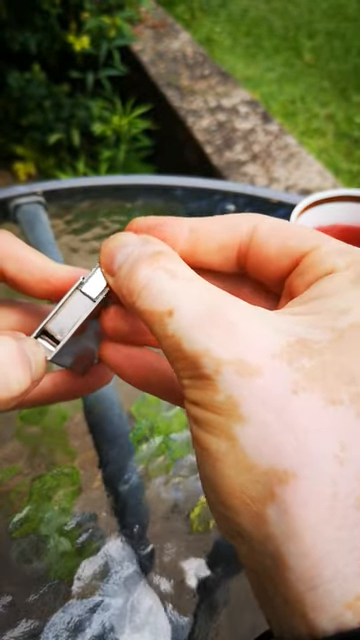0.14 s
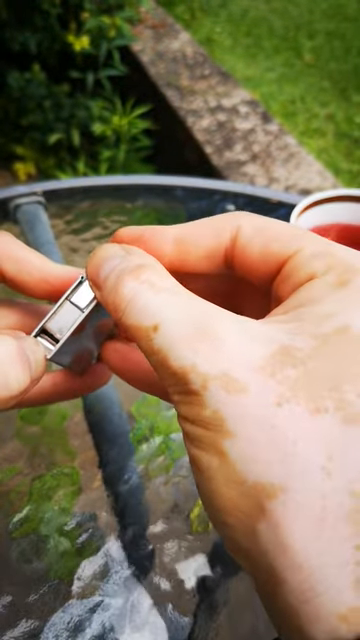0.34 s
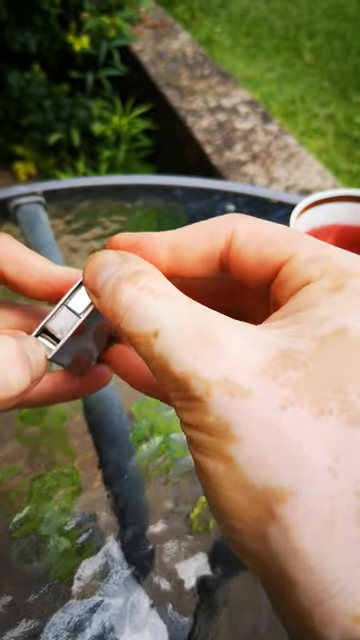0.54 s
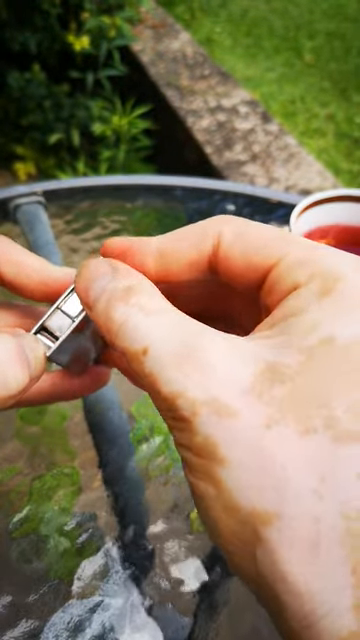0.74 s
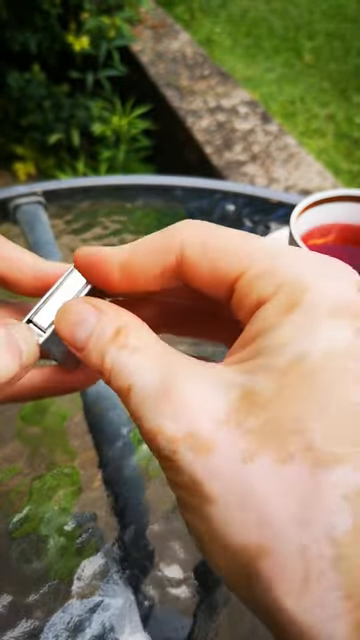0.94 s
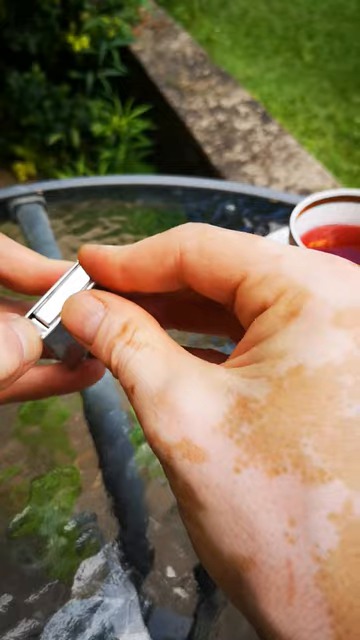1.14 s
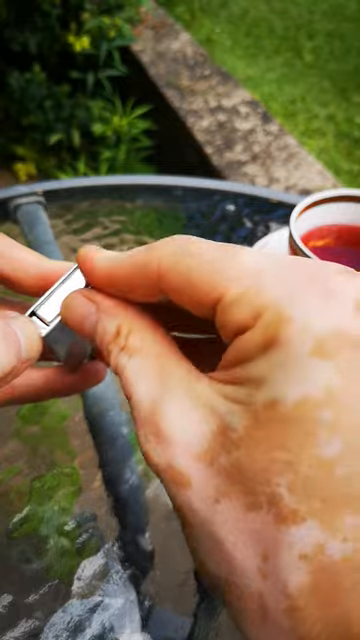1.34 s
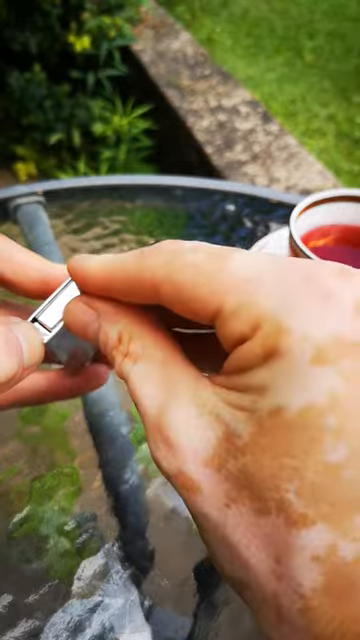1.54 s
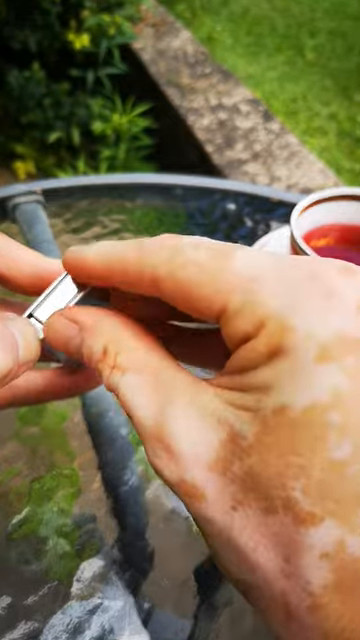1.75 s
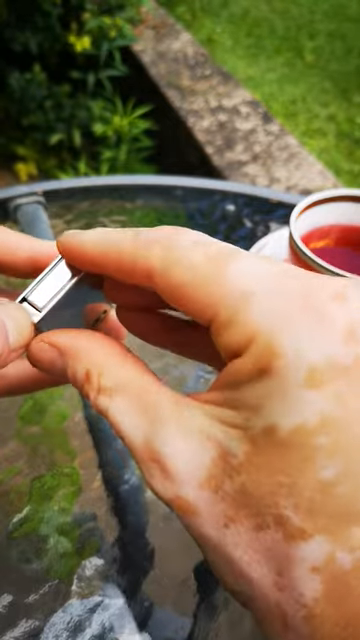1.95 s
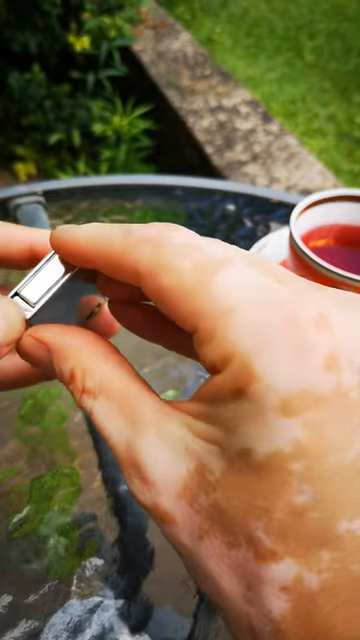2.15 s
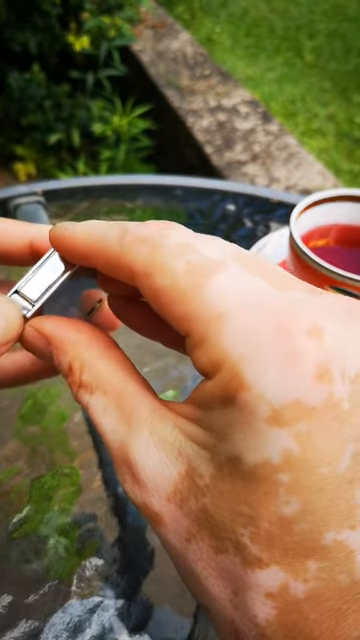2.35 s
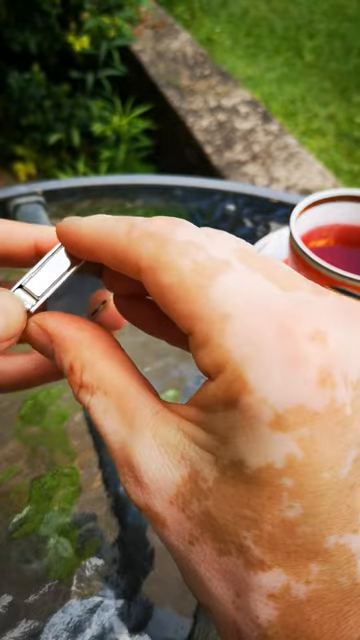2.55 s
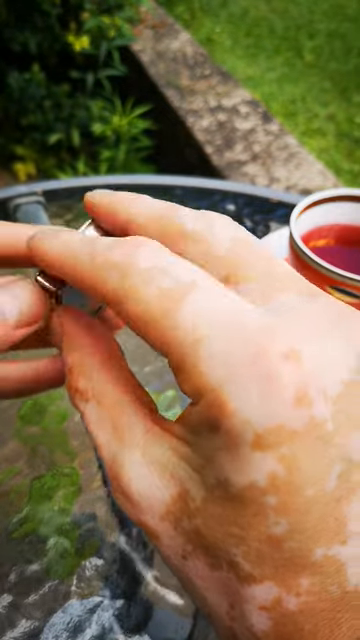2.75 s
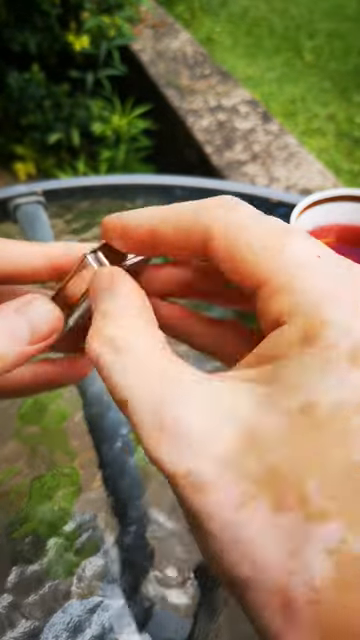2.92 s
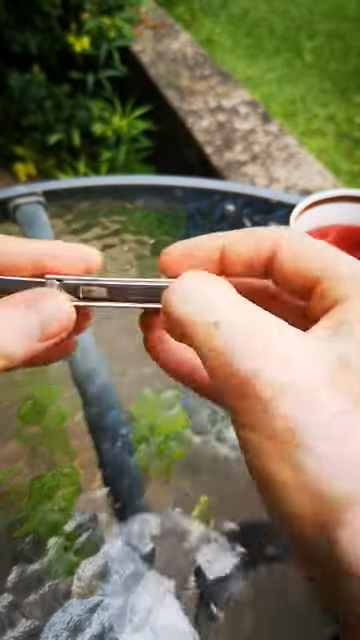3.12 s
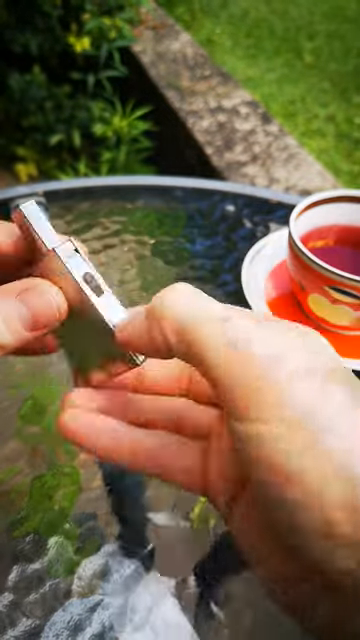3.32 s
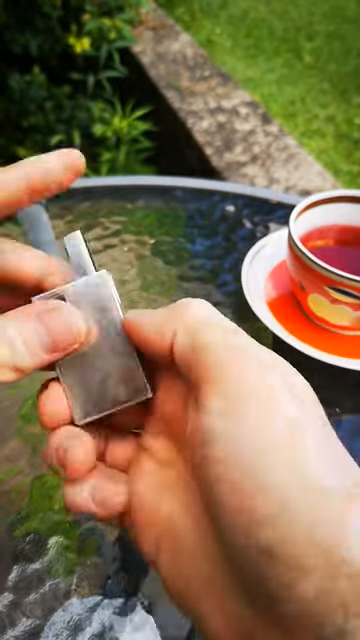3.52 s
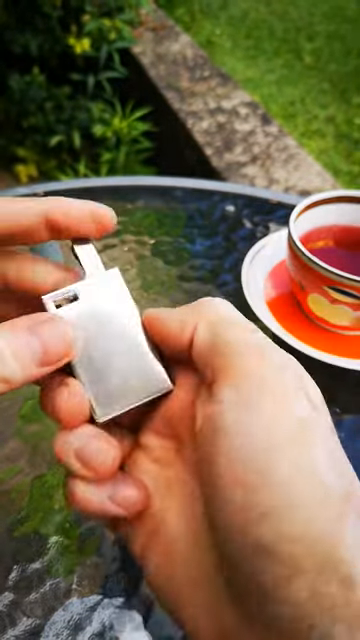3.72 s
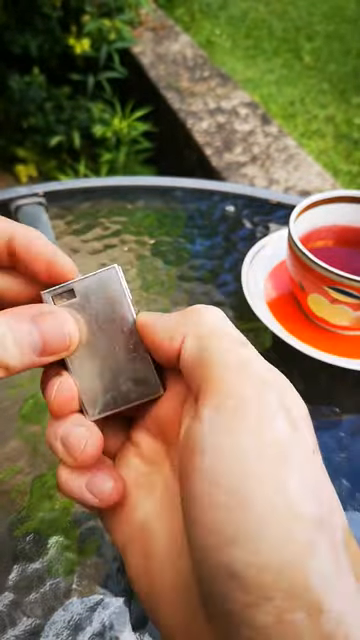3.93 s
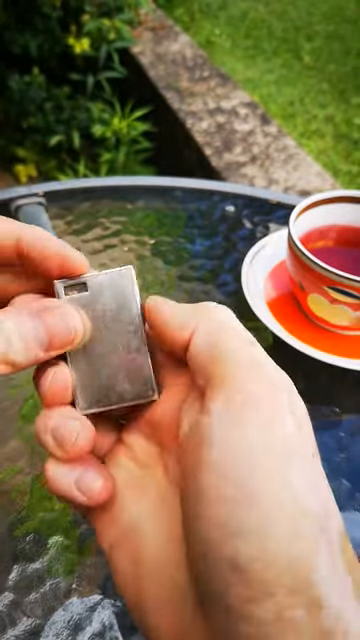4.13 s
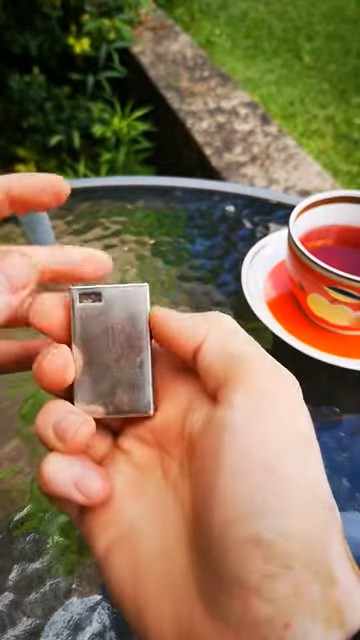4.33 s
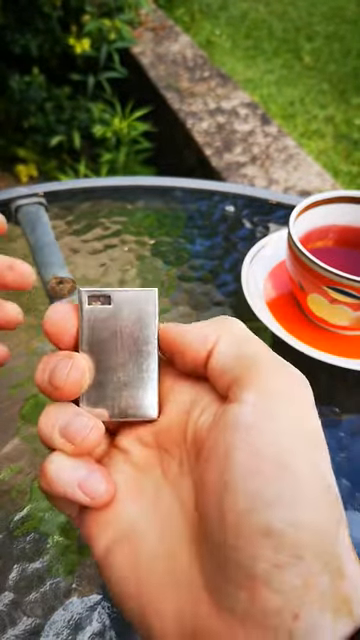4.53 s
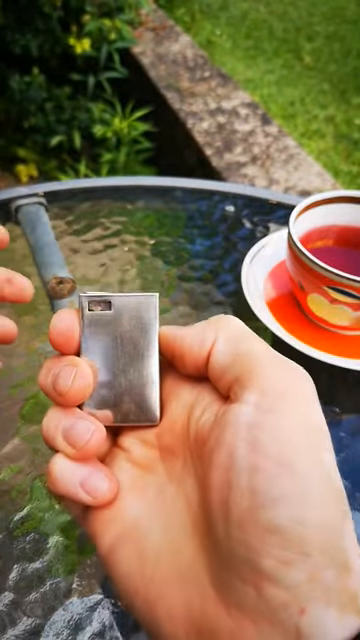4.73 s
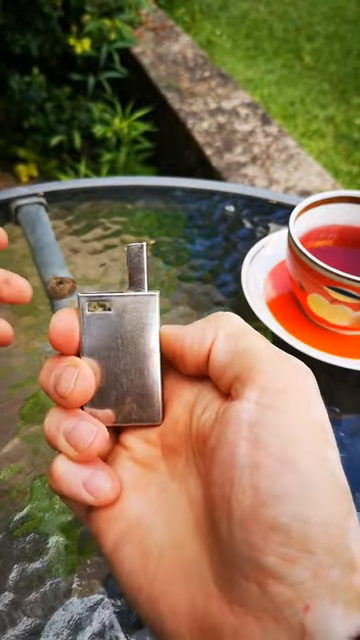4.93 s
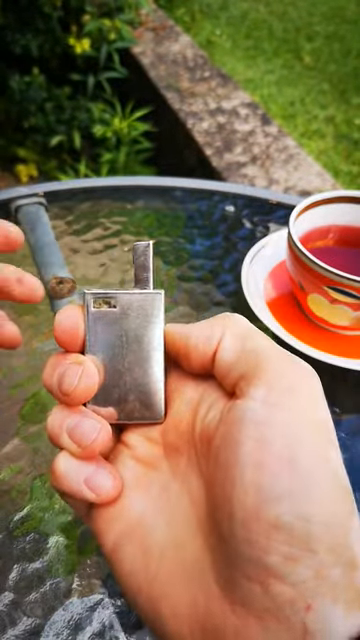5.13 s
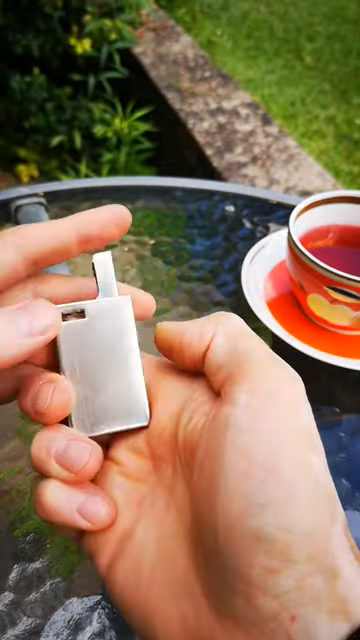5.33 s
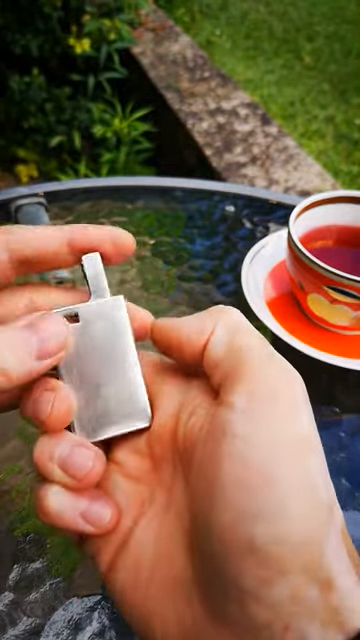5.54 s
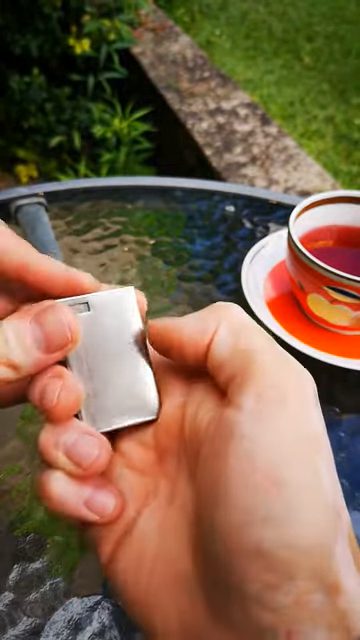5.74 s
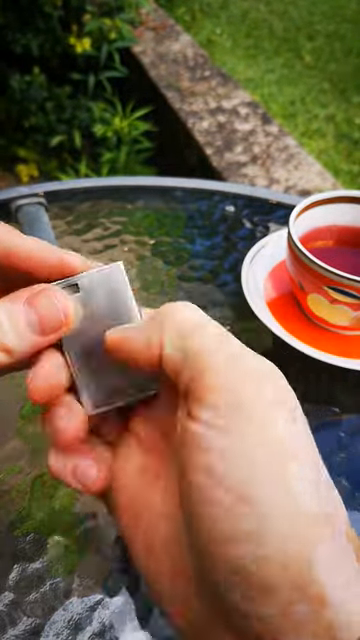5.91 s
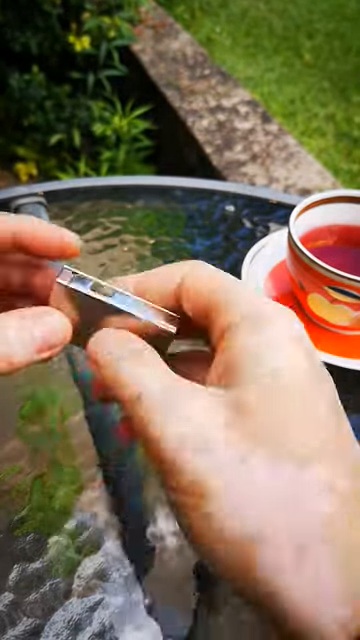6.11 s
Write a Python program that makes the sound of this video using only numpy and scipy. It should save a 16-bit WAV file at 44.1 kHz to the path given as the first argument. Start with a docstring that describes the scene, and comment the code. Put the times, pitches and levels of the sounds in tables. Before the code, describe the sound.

A close outdoor stereo pickup over a glass garden table. Low, irregular rumble and soft hiss of distant traffic run throughout. A barely audible tick comes at the start, then a bright, thin metal click at 0.9 s and a dull glassy knock at 1.0 s, with a weaker one just after. Only tiny ticks follow around 2.0 and 2.4 s. Near 3.2-3.5 s a faint bird whistle glides up and then slightly down; light metal ticks and a short rattling scrape follow until 3.65. At 3.88 a hard, dense snap bursts out, scraping into a duller clack at 3.98. A faint engine drone grows behind. At 4.92 a sharp snap leaves a thin, high ring. Small ticks and slides at 5.25-5.47 lead to a rising scrape and solid clack at 5.76, then a soft table knock at 6.14. Each loud hit has a short, scattered garden echo.

```python
"""In a garden, a small metal pocket lighter is worked by hand over a glass table.
Its latch and sliding bar snap, rattle and scrape: short bursts and small grains ring its metal parts.
Something knocks the table top, which rings too, and the garden scatters all these near sounds back.
Behind lie the hiss and rumble of far traffic (filtered noise), an engine's drone (wavering tones)
and birds (gliding whistles)."""
import sys
import numpy as np
from scipy import signal
from scipy.io import wavfile
from scipy.ndimage import uniform_filter1d

SR = 44100
rng = np.random.default_rng(int(sys.argv[2]) if len(sys.argv) > 2 else 0)


def magnitude_from_level(level_db):
    """Linear magnitude for a level in decibels (20 dB per decade)."""
    exponent = np.asarray(level_db, float) / 20
    return 10 ** exponent


def output_pcm(signal):
    """Save a mono or channel-first signal as 16-bit PCM at the path in sys.argv[1].

    Samples are clipped to [-1, 1] before scaling.
    """
    pcm = np.clip(np.atleast_2d(signal).T, -1, 1) * 32767
    wavfile.write(sys.argv[1], SR, np.round(pcm).astype(np.int16))


N = 272097


def rms_one(x):
    """Scale to rms 1."""
    return x / np.sqrt(np.mean(x ** 2) + 1e-20)


def in_time(curve):
    """Read a curve of (time, value) points at every sample."""
    times, values = np.transpose(curve)
    return np.interp(np.arange(N) / SR, times, values)


def at_hz(points, hz):
    """Read a curve of (frequency, value) points on a log-frequency axis."""
    point_hz, values = np.transpose(points)
    return np.interp(np.log(hz), np.log(point_hz), values)


def drift(rate_hz):
    """Slow random wandering of rms 1: smoothed noise, drawn once every 40 samples."""
    r = np.exp(-2 * np.pi * rate_hz * 40 / SR)
    noise = rng.standard_normal(N // 40 + 2002)
    slow = signal.lfilter([1], [1, -2 * r, r * r], noise)[2000:]   # leave out the run-in
    return np.interp(np.arange(N) / 40, np.arange(len(slow)), rms_one(slow))


def chatter(shape):
    """Stereo noise, partly alike on both sides."""
    alike = 0.4   # share of the power that both sides have in common
    common = rng.standard_normal(shape)
    own = rng.standard_normal((2, *shape))
    return np.sqrt(alike) * common + np.sqrt(1 - alike) * own


def ring(force, modes):
    """A force sets parallel modes (f/Hz, level/dB, time to die by 60 dB/s) ringing, signs alternating."""
    out = 0
    for k, (hz, level_db, t60) in enumerate(modes):
        r = magnitude_from_level(-60 / (t60 * SR))
        w = 2 * np.pi * hz / SR
        push = (-1) ** k * magnitude_from_level(level_db) * np.sin(w)
        out = out + signal.lfilter([0, push], [1, -2 * r * np.cos(w), r * r], force + 1e-18)
    return out


def place(sounds, times, pans_db):
    """Lay stereo sounds in time, panned (left over right, dB) at even power."""
    length = sounds.shape[2]
    out = np.zeros((2, N + length))
    for k, (start, pan_db) in enumerate(zip(times, pans_db)):
        i = round(start * SR)
        side = rms_one(magnitude_from_level(np.array([[pan_db / 2], [-pan_db / 2]])))
        out[:, i:i + length] += sounds[:, k] * side
    return out[:, :N]


def lagged(pair, lag_ms):
    """Delay the left channel against the right."""
    lag = round(lag_ms * SR / 1000)
    return np.array([np.roll(pair[0], lag), pair[1]])


def road_noise():
    """Half-octave bands of noise, from deep rumble to hiss, rise and fall together under one curve."""
    # noise spectrum before the gain below: f/Hz, strength/dB
    spectrum = [(20, -9), (40, -8.5), (69, -14), (96, -21), (150, -23.5), (250, -25), (330, -37.5),
                (450, -34), (650, -37), (1050, -30), (1500, -39.5), (1900, -39), (2960, -53), (7000, -59),
                (11000, -67.5), (15100, -65.5)]
    # how alike left and right are: f/Hz, likeness/1
    likeness = [(60, 0.97), (180, 0.97), (400, 0.96), (800, 0.28), (1600, 0.14), (4000, .15), (15000, .02)]
    # gain of the road noise: t/s, gain/dB
    road_gain = [(0.0, -18.5), (0.48, -19.5), (1.1, -18), (1.41, -19), (2.75, -19.5), (3.33, -18),
                 (4.76, -17.5), (5.0, -20.5), (5.36, -17.5), (6.17, -17)]
    hush, together, run_in = 0, drift(1.9), SR // 2
    edges = 18 * 2 ** np.arange(0, 10.2, 0.5)
    white = rng.standard_normal((2, 2, N + run_in))
    for k, (lo, hi) in enumerate(zip(edges, edges[1:])):
        band = signal.butter(2, [lo, hi], "band", fs=SR, output="sos")
        # neighbouring bands take different noise
        mid, side = signal.sosfilt(band, white[k % 2])[:, run_in:]
        hz = np.sqrt(lo * hi)
        alike = np.clip(at_hz(likeness, hz), -1, 1)
        gain = magnitude_from_level(at_hz(spectrum, hz) + 0.26 * (together + drift(8)))
        pair = gain * (np.sqrt(1 + alike) * mid + np.sqrt(1 - alike) * side * [[1], [-1]])
        # the road lies to the right; the deep part reaches both sides together, almost the same
        hush = hush + lagged(pair, 0.58 * (hz > 200))
    return hush * magnitude_from_level(in_time(road_gain))


def deep_rumble():
    """Deep rumble near 60 Hz: narrow-band noise, its level rising and falling irregularly."""
    # irregular rise and fall of the level: t/s, level/dB
    rumble_curve = [(0.0, -43), (0.36, -60), (0.39, -44.5), (0.53, -60), (0.58, -48.5), (1.99, -46),
                    (2.75, -56.5), (2.8, -36.5), (2.85, -53), (2.99, -44.5), (3.37, -56), (3.4, -44),
                    (3.71, -61.5), (4.09, -47), (5.19, -54), (5.29, -40), (5.4, -62), (5.52, -41.5),
                    (6.07, -55.5), (6.17, -44)]
    centre_hz, half_width_hz, run_in = 59.8, 15, SR // 2
    wander_db, wander_rate_hz = 2.5, 1.3   # further random changes of level
    edges = [centre_hz - half_width_hz, centre_hz + half_width_hz]
    band = signal.butter(2, edges, "band", fs=SR, output="sos")
    rumble = signal.sosfilt(np.vstack([band, band]), rng.standard_normal(N + run_in))[run_in:]
    # divide by the noise's own level over 3000 samples to hold it more even
    even = rumble / np.sqrt(uniform_filter1d(rumble ** 2, size=3000))
    return even * magnitude_from_level(in_time(rumble_curve) + wander_db * drift(wander_rate_hz))


def drone():
    """Wavering tones of a distant engine, drifting in pitch and level."""
    # tones before swell and wavering: f/Hz, level/dB rms
    engine_tones = [(108, -64), (172.3, -66), (269.2, -68.5), (325, -73)]
    # slow swell of all tones: t/s, gain/dB
    swell_curve = [(0, -8.5), (3.6, -8.5), (4.1, 2), (5.0, 0.5), (6.17, -2.5)]
    swell_db = in_time(swell_curve)
    out = 0
    for hz, level_db in engine_tones:
        loudness = magnitude_from_level(level_db + swell_db + 3.5 * drift(10.0))
        phase = 2 * np.pi * np.cumsum(hz * (1 + 0.016 * drift(5))) / SR
        out = out + np.sqrt(2) * loudness * np.sin(phase)
    return out


def bird_whistles():
    """Thin gliding whistles, far off, each swelling and fading."""
    # start t/s, length/s, first f/Hz, last f/Hz, level at the height of the swell before wavering/dB rms
    whistles = [(3.189, .13, 2000, 2660, -71.5), (3.328, 0.13, 2560, 2400, -71),
                (3.684, 0.13, 2300, 2010, -87), (3.28, .035, 5750, 5900, -84), (3.45, .08, 5680, 5630, -82),
                (3.6, .1, 4970, 4450, -90)]
    out = 0
    for start, length, first_hz, last_hz, level_db in whistles:
        along = np.clip((np.arange(N) / SR - start) / length, 0, 1)
        hz = (first_hz + (last_hz - first_hz) * along) * (1 + 0.004 * drift(33))
        swell = np.sqrt(2 * np.abs(np.sin(np.pi * along)))
        loudness = magnitude_from_level(level_db + 1.5 * drift(25))
        out = out + swell * loudness * np.sin(2 * np.pi * np.cumsum(hz) / SR)
    return out


def garden(near):
    """Walls and hedges scatter each click back as a tail dying band by band, different on each side."""
    # bands of the tail: f/Hz, strength/dB, time to die by 60 dB/s
    echo_bands = [(1497.7, -25.5, 0.25), (2470, -26.5, .2), (3680, -22, 0.13), (4840, -25, .28),
                  (6600, -26.5, 0.31), (10040, -24.5, 0.22), (13900, -28, 0.2)]
    t, tail = np.arange(SR // 2) / SR, 0
    for hz, level_db, t60 in echo_bands:
        band = signal.butter(2, [hz / 1.3, hz * 1.18], "band", fs=SR, output="sos")
        dying = magnitude_from_level(-60 * t / t60) * np.clip(t / 0.002, 0, 1)   # fades in over 2 ms
        noise = signal.sosfilt(band, rng.standard_normal((2, len(t))))
        tail = tail + noise * dying * magnitude_from_level(level_db) / np.linalg.norm(dying)
    return signal.fftconvolve(near, tail, axes=1)[:, :N]


def table_knocks():
    """Dull blows ring the modes of the glass top: a sharp touch with a brief rattle dying away."""
    # blows: t/s, strength/dB, left over right/dB
    blows = [(1.017, -28, -3.5), (1.133, -39.5, -2), (4.024, -39, -3.5), (6.144, -36, -9.5)]
    # modes of the table top: f/Hz, level/dB, time to die by 60 dB/s
    glass_modes = [(252.3, -4.5, 0.27), (380, -5.5, 0.032), (579.3, -14.5, 0.023), (800, -8.5, 0.039),
                   (1065, -3.5, 0.021), (1360, -8, 0.06), (1644, -1, 0.0608), (1780, -4.5, 0.053),
                   (2025, -5.5, 0.071), (2484, -5.5, 0.026), (2748, -5.5, 0.025), (3790, -17, 0.01295),
                   (5120, -21, 0.018), (7750, -25, 0.0047)]
    times, level_db, pan_db = np.transpose(blows)
    t = np.arange(1800) / SR
    rattle = chatter((len(times), len(t))) * np.exp(-t / 0.01)
    force = (t == 0) + 0.12 * rattle
    return ring(place(force * magnitude_from_level(level_db - 11.0)[:, None], times, pan_db), glass_modes)


def strike(levels_db, modes, chatter_ms):
    """Each blow is a burst of micro-impacts, scaled so that its ring peaks at the given level."""
    span = np.arange(200)
    bursts = chatter((len(levels_db), len(span))) * np.exp(-span / (chatter_ms * SR / 1000))
    rings = ring(np.pad(bursts, ((0, 0), (0, 0), (0, 4000))), modes)   # room to ring out
    return rings * magnitude_from_level(levels_db)[:, None] / np.abs(rings).max(axis=2, keepdims=True)


def bar_scrape(modes, bright_share, part_db):
    """While the bar slides or rattles in its slot, dense small grains of uneven size ring a part."""
    # start t/s, end t/s, case level at start/dB rms, case level at end/dB rms, brightness/dB
    slides = [(0.33, 0.375, -79, -84, 5.5), (3.345, 3.364, -62.5, -53.5, 3),
              (3.538, 3.587, -48, -49.5, -11), (3.581, 3.659, -54, -71, -41.5),
              (3.887, 3.963, -46.5, -55.5, -14.5), (5.265, 5.35, -57, -71.5, -27),
              (5.431, 5.474, -52, -88, -20), (5.664, 5.737, -66.5, -36, -22),
              (5.742, 5.761, -41.5, -33.5, -9)]
    t, effort = np.arange(N) / SR, 0
    hits = rng.random(N) < 4000 / SR   # 4000 grains per second on average
    grains = hits * chatter((N,)) * magnitude_from_level(3.0 * rng.exponential(1, N))
    for start, end, first_db, last_db, bright_db in slides:
        case_db = np.interp(t, [start, end], [first_db, last_db], -200, -200)
        effort = effort + magnitude_from_level(case_db + bright_share * bright_db + part_db)
    smooth_effort = uniform_filter1d(effort, size=round(0.006 * SR))   # over 6 ms
    return rms_one(ring(grains, modes)) * smooth_effort


def free_bar():
    """Thin tones of the bar when it stands free: single pushes let it ring on."""
    # tones of the bar: f/Hz, level/dB, time to die by 60 dB/s
    bar_tones = [(3630, -2.5, 0.26), (3854, 1.5, 0.18), (4140, 0, 0.28)]
    # blows that reach it: t/s, then the push on each of the three tones/dB
    pushes = [(4.916, -60, -47, -56.5), (5.425, -62, -76, -83)]
    times, *tones_db = np.transpose(pushes)
    out = 0
    for tone, level_db in zip(bar_tones, tones_db):
        clicks = np.ones((2, 1, 1)) * magnitude_from_level(level_db)[:, None]
        out = out + ring(place(clicks, times, 0 * times), [tone])
    return out


def lighter():
    """Snaps and scrapes of metal on metal ring the case, the lid and the small parts, each with its modes."""
    # metal on metal: t/s, case level/dB peak, brightness (small parts over case)/dB,
    # turn of the lighter (left over right of lid and small parts)/dB
    contacts = [(0.0316, -50.5, 17.5, 4), (0.0334, -49, 15, -2), (0.337, -58, -4, -2),
                (0.9166, -28.5, 11, 9), (0.9193, -19, 9, 19), (0.9214, -17, 13, 24.5),
                (0.9228, -20.5, 13.5, 2.5), (2.021, -55.5, -4, -5), (2.027, -52, -9, 3.5),
                (2.408, -60, 1.5, 1), (2.434, -66.5, 4, -3), (2.46, -61, 11.5, -5),
                (2.468, -64.5, 13.5, -1.5), (3.33, -61.5, 7, 1), (3.353, -52, 11, 20), (3.36, -45, 0, 0),
                (3.537, -33, -4, 3.5), (3.542, -34.5, 0.5, -7), (3.557, -36, -2, -2.5),
                (3.567, -37.5, -10, -1.5), (3.577, -32, -6, -0.5), (3.809, -57, -10.5, 1),
                (3.877, -11.5, 4.5, 6), (3.8788, -12, 3, 9.5), (3.881, -9.5, 3, 2.5), (3.883, -14, 1, 4.5),
                (3.8866, -14, -5, 1), (3.925, -41, -9.5, 2.5), (3.966, -29, -16.5, -3),
                (3.9724, -20, -13, 3), (3.9822, -8, -7, 5), (3.9847, -22, 0.5, 18.5), (4.0, -44, -10, -3),
                (4.442, -52.5, -12, -3), (4.6, -53, -17.5, -3), (4.907, -36.5, -3.5, 0),
                (4.9126, -29, -0.5, -1.5), (4.916, -6.5, 6, 3), (4.9189, -14.5, -4, -3),
                (4.922, -14, 5.5, -1.5), (5.249, -46.5, -29, 1), (5.2556, -30, -13.5, 3),
                (5.277, -35, -13, 2), (5.309, -43, -18, -2.5), (5.346, -53, -22, -1),
                (5.425, -35.5, -12.5, 3), (5.701, -36.5, -15.5, 0.5), (5.736, -30.5, -13, 1),
                (5.747, -29, -23, -5), (5.7518, -25, -5, 4), (5.7621, -6, -7.5, 5), (5.764, -16, -7, 0.5)]
    # modes of the case: f/Hz, level/dB, time to die by 60 dB/s
    case_modes = [(1583, -6, .013), (1920, 0, 0.008), (2420, -5.5, 0.012), (2630, 2, 0.015),
                  (2840, 2, .012)]
    # modes of the lid: f/Hz, level/dB, time to die by 60 dB/s
    lid_modes = [(3690, -0.4, 0.01), (4440, -2.5, 0.0068), (4830, -2, 0.011), (5380, -1.2, 0.0081),
                 (5980, -0.04, 0.011)]
    # modes of the small parts: f/Hz, level/dB, time to die by 60 dB/s
    small_modes = [(6360, 3, 0.0032), (7050, 1.5, 0.0077), (7830, -3, .005), (9180, -3, 0.0025),
                   (8770, -5.5, .004), (9730, -4, 0.0033), (11350, -7, .004), (11800, -12, 0.0062),
                   (13200, -11, 0.0058), (14500, -11.5, 0.0032)]
    # case, lid and small parts each radiate little above their modes: top f/Hz
    part_tops = [4260, 8200, 12200]
    times, case_db, bright_db, turn_db = np.transpose(contacts)
    # the case leans right, and swings against the lid as the lighter turns
    case_pan_db = -1 - 1.3 * turn_db
    # against a hard blow, lighter ones reach the two deepest case modes less and the lid more
    over_hard_db = case_db + 9.5
    deep_db = -7 + 0.2 * over_hard_db
    lid_db = -2.5 - 0.046 * over_hard_db
    # modes, share of the brightness, gain in blows/dB, gain in slides/dB, left over right/dB, top f/Hz
    parts = [(case_modes[:2], 0, deep_db, -7.5, case_pan_db, part_tops[0]),
             (case_modes[2:], 0, 0, 0, case_pan_db, part_tops[0]),
             (lid_modes, 0.48, lid_db, -5.5, turn_db, part_tops[1]),
             (small_modes, 1, 0, 0, turn_db, part_tops[2])]
    out = free_bar()
    for modes, share, blow_db, slide_db, pan_db, top_hz in parts:
        snaps = strike(case_db + share * bright_db + blow_db, modes, chatter_ms=0.58)
        part = place(snaps, times, pan_db) + bar_scrape(modes, share, slide_db)
        out = out + signal.sosfilt(signal.butter(2, top_hz, fs=SR, output="sos"), part)
    # the body is too small to radiate well below 1350 Hz
    return signal.sosfilt(signal.butter(4, 1350, "high", fs=SR, output="sos"), out)


def scene():
    """Near clicks and knocks with their echo, over the far background."""
    near = lighter() + table_knocks()
    far = road_noise() + deep_rumble() + drone() + bird_whistles()
    return near + garden(near) + far


def roll_off(x):
    """The treble ends steeply here."""
    return signal.sosfilt(signal.butter(12, 16550, fs=SR, output="sos"), x)


def record(dry):
    """Clip the mix at full scale and finish it."""
    mix = np.clip(dry, -1, 1)
    return roll_off(mix)


dry = scene()
out = record(dry)
output_pcm(out)
```